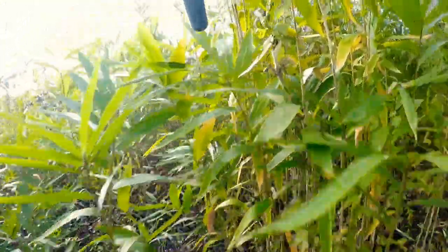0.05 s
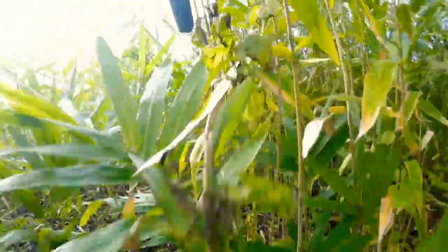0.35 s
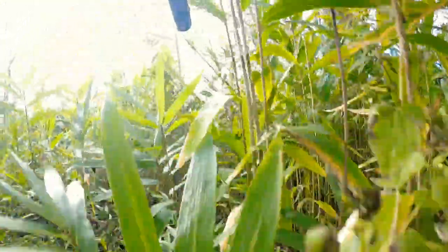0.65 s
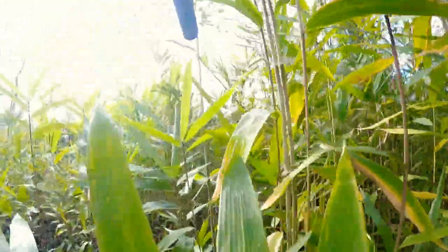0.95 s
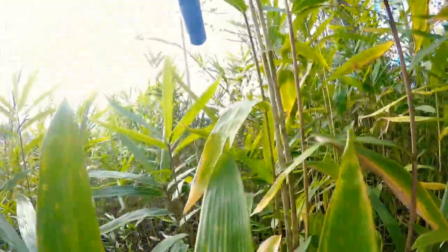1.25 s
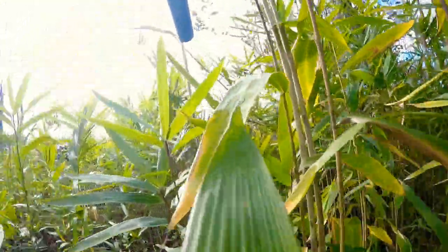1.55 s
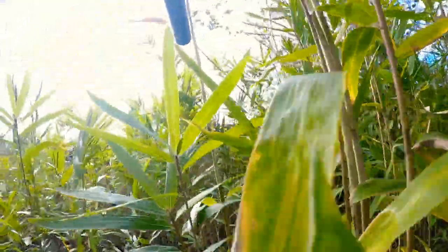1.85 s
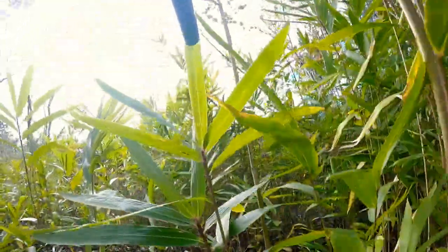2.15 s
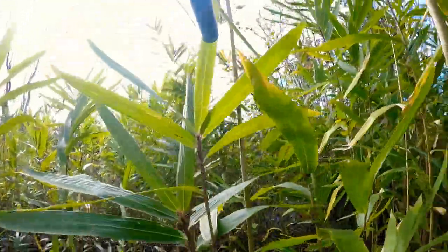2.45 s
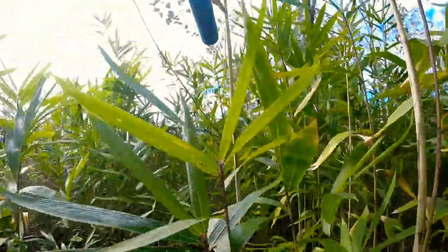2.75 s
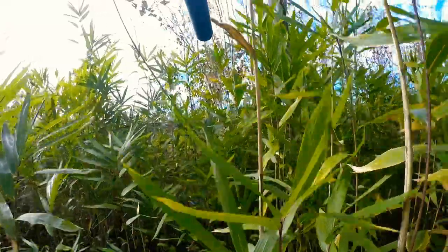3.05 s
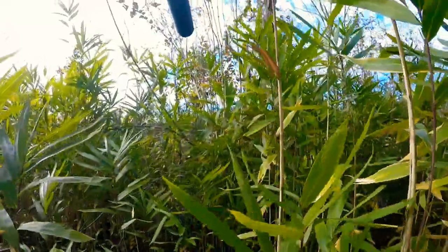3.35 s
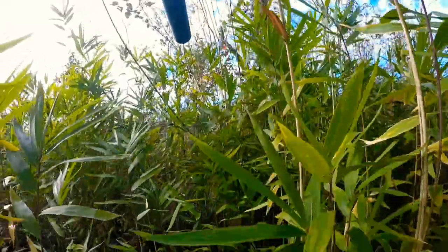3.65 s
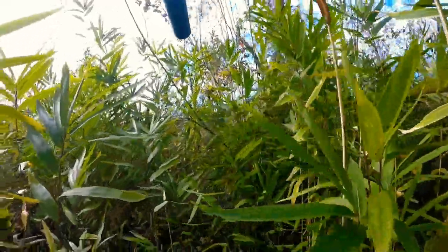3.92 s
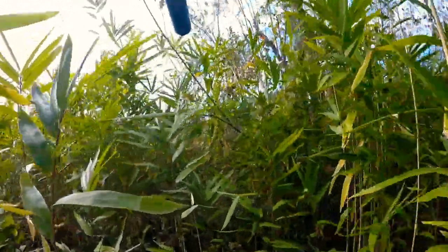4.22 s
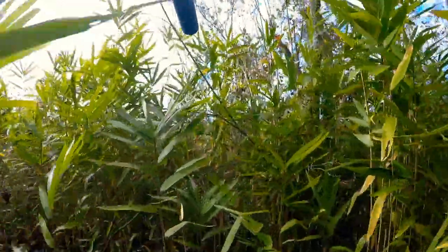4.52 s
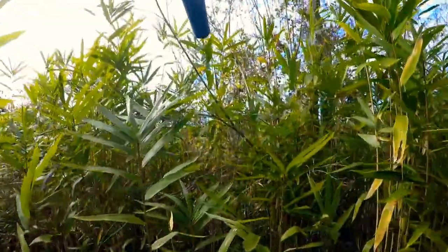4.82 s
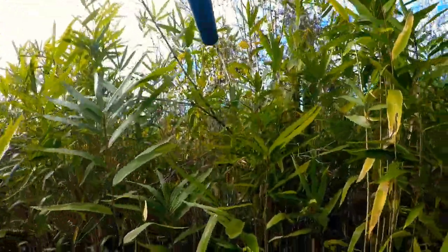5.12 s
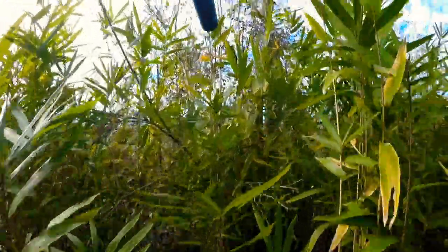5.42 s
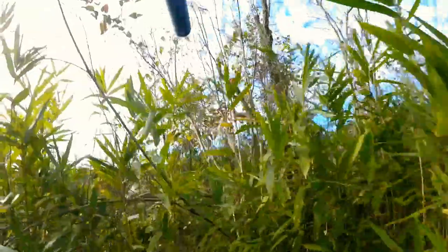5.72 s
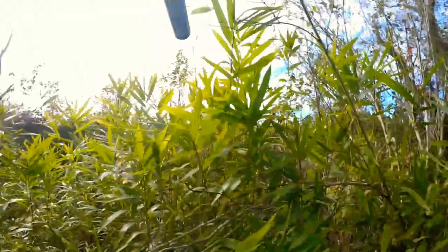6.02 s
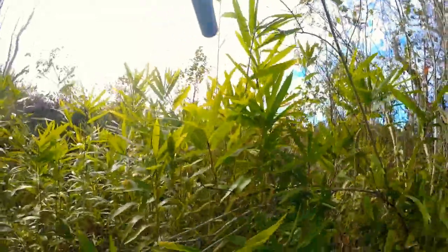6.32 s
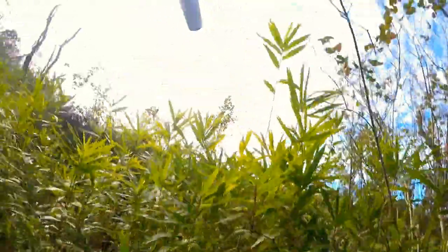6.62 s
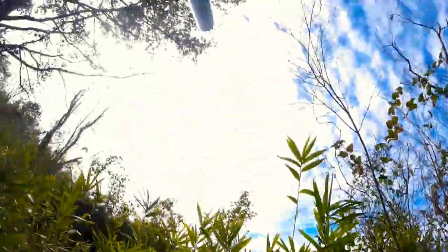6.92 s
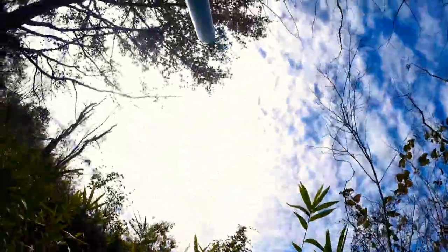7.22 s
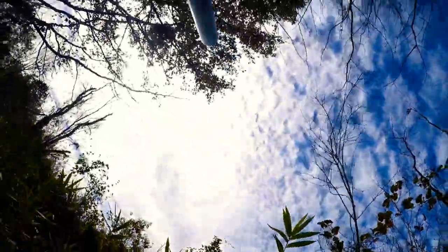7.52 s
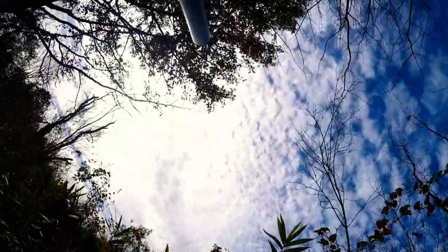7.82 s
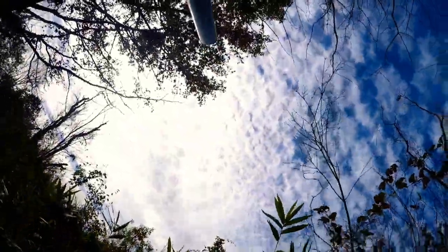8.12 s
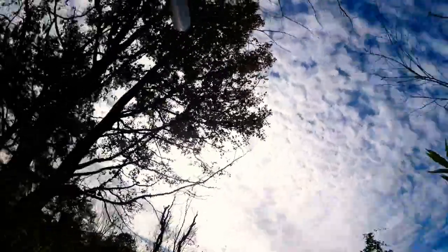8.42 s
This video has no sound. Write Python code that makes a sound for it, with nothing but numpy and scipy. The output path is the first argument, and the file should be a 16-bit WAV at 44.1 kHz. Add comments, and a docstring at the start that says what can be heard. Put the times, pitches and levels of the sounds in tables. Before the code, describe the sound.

Someone pushes through a dense cane thicket outdoors, heard from a camera worn on the body. Dry leaves swish and crackle right at the microphones, and twigs snap, most thickly at the start. Stems knock on the case throughout, and scrape and briefly squeal along it in the first half. Later come duller bumps and creaks from the holder. Every step shakes the mount into a heavy low rumble, and the rustle thins near the end.

```python
"""Dry leaves swish and crackle right at the microphones, and twigs snap close by.
The place is a cane thicket, heard from the stereo pair of a body-worn camera pushed through it.
Stems knock, scrape and squeal on the case, which rocks between its two microphones and creaks
in its holder. Underneath, every step shakes the mount into a heavy low rumble."""
import sys
import numpy as np
from scipy import signal
from scipy.fft import rfft, irfft, next_fast_len
from scipy.io import wavfile
from scipy.ndimage import map_coordinates

SR = 44100
rng = np.random.default_rng(int(sys.argv[2]) if len(sys.argv) > 2 else 0)


def int16_out(signal):
    """Quantize to a 16-bit WAV file."""
    q = np.round(np.clip(np.atleast_2d(signal).T, -1, 1) * 32767)
    wavfile.write(sys.argv[1], SR, q.astype(np.int16))


N = 381906

# foliage pressing on the body: (time [s], blade swish [dB], stalk crunch [dB])
BRUSHING = [(0, -37.5, -62), (.3, -30.5, -38), (.55, -34.5, -47.5), (.93, -32.5, -39), (1.03, -43.5, -58),
            (1.6, -45, -43.5), (2.17, -50, -49.5), (2.3, -41, -46.5), (3.0, -34.5, -41.5),
            (3.35, -37, -45.5), (4.5, -37.5, -46), (5.33, -34, -38.5), (5.4, -46.5, -51), (5.83, -49, -50),
            (5.95, -42, -47.5), (6.75, -38, -49.5), (7.7, -47, -52), (8.66, -54.5, -59)]
# single sprays passing the microphones: (time [s], length [s], swish [dB], crunch [dB])
SPRAYS = [(0.104, 0.027, -31, -49), (.29, 0.11, -29, -38), (0.84, 0.048, -32.5, -45),
          (1.412, 0.026, -39.5, -48), (2.272, .06, -38, -43), (2.502, 0.058, -32.5, -40),
          (2.678, .06, -35, -38), (2.96, 0.047, -34.5, -41), (3.126, 0.011, -31, -40),
          (3.84, 0.052, -37, -56), (4.129, 0.016, -28, -46), (4.563, 0.077, -35, -60),
          (4.834, 0.13, -37.5, -56), (5.173, 0.06, -30, -40.5), (5.882, 0.033, -36.5, -57),
          (6.164, 0.054, -33, -72), (6.395, 0.04, -36.5, -49), (6.526, .02, -41, -35),
          (6.606, 0.027, -32.5, -43), (6.71, 0.11, -33.5, -36.5), (7.079, 0.2, -36.5, -43),
          (7.51, 0.018, -39.5, -53), (7.85, 0.19, -46.5, -50.5), (8.228, 0.049, -53, -65),
          (8.508, 0.068, -47.5, -46)]
# drier leaves add a fine sizzle near 10 kHz: (time [s], level against the swish [dB])
LEAF_DRYNESS = [(0, -18), (1.2, -15), (2.2, -14), (6.3, -15), (7.2, -7), (7.9, -5.5), (8.66, -10.5)]
# spectra of the swish, sizzle and crunch at close range: (frequency [Hz], relative density [dB])
SWISH_SPECTRUM = [(1500, -10), (3500, -5), (5000, -5), (6300, 1), (7300, 2.5), (7800, 1), (8500, -9),
                  (10000, -10), (11500, -13), (13200, -16.5), (14300, -32), (15500, -52)]
SIZZLE_SPECTRUM = [(5000, -54), (8300, -4), (9300, -3), (10200, -1), (11500, -12), (13500, -17),
                   (15000, -46)]
CRUNCH_SPECTRUM = [(200, -1), (500, -12), (900, -5), (1500, 5), (2200, 3.5), (3000, 3), (4200, -2.5),
                   (5500, 0), (8000, -7.5), (12000, -66)]
def leaves():
    """Blades swish and sizzle against the wearer; stalks and litter crunch lower down."""
    rise_s, fall_s = .062, .071
    blade_sweeps = swells([(s, length, db) for s, length, db, _ in SPRAYS], rise_s, fall_s)
    stalk_sweeps = swells([(s, length, db) for s, length, _, db in SPRAYS], rise_s, fall_s)
    blades_db, stalks_db = curves(BRUSHING)
    blades = np.hypot(amp(blades_db), blade_sweeps)
    stalks = np.hypot(amp(stalks_db), stalk_sweeps)
    dry_blades = blades * amp(curves(LEAF_DRYNESS)[0])
    swish = blades * foliage(SWISH_SPECTRUM, rate=3000, spread_db=2, hiss_db=-.5, clump_db=3)
    sizzle = dry_blades * foliage(SIZZLE_SPECTRUM, rate=3000, spread_db=3.5, hiss_db=-.5, clump_db=5.5)
    crunch = stalks * foliage(CRUNCH_SPECTRUM, rate=2000, spread_db=4, hiss_db=0, clump_db=5.5)
    unevenness = amp(1.4 * wobble(22))
    return lulls() * unevenness * (swish + sizzle + crunch)


# stereo width of the leaves at the pair: (frequency [Hz], side minus mid [dB])
LEAF_WIDTH = [(500, 7.5), (3000, -8), (4300, -10), (5800, -2.5), (7300, -3.5), (8500, 2), (14000, -1)]
# their balance: (frequency [Hz], left minus right [dB])
LEAF_BALANCE = [(1000, 1), (3500, 0), (5800, 0.5), (7500, 3), (8800, -7.5), (14000, -3)]
def foliage(spectrum, rate, spread_db, hiss_db, clump_db):
    """Near leaves tick in clumps over the hiss of many farther ones."""
    clumps = amp(clump_db * (wobble(45) + wobble(220)))
    ticks = np.array([grains(rate, spread_db), grains(rate, spread_db)])
    rustle = unit(clumps * ticks) + amp(hiss_db) * rng.standard_normal((2, N))
    mid = filtered(rustle[0], lambda hz: amp(along(spectrum, hz)))
    side = filtered(rustle[1], lambda hz: amp(along(spectrum, hz) + along(LEAF_WIDTH, hz)))
    stereo = np.array([mid + side, mid - side]) / np.std(mid)
    return filtered(stereo, lambda hz: balance(along(LEAF_BALANCE, hz)))


# dips in the rustle at hard blows on the case: (time [s], depth [dB])
RUSTLE_DIPS = [(1.615, 10), (2.565, 6), (4.215, 4.5), (5.35, 11), (5.49, 3.5), (8.068, 12)]
def lulls(onset_s=.01, return_s=.074):
    """Gain of the rustle: a quick drop, then a gradual return."""
    t, dip_db = np.arange(N) / SR, 0
    for s, depth_db in RUSTLE_DIPS:
        onset = np.clip((t - s) / onset_s, 0, 1)
        dip_db += depth_db * onset * np.exp(-((t - s) / return_s) ** 2)
    return amp(-dip_db)


# twigs and dry leaves breaking close by: (time [s], level [dB], woody band [dB], left minus right [dB])
TWIG_BREAKS = [(0.19, -16, -6, -5), (0.27, -21, -17, 3), (0.3406, -11, -4, 1), (0.404, -14, -25, 3),
               (0.462, -16.5, -31, 0), (0.6826, -23, -24, 5), (0.7113, -26, -17, 1.5),
               (0.922, -15.5, -24, 4), (0.969, -16.5, 2, -5), (1.4885, -24.5, -16, -10),
               (1.6077, -23.5, -29, -18), (2.4857, -25, -22, -2), (3.1293, -12.5, -30, 7),
               (3.5743, -20.5, -26, 2), (4.373, -21.5, -18, 6), (4.4007, -24, -17, 2), (5.4586, -23, 4, 6),
               (5.6675, -31.5, -19, 5), (5.876, -28, 5, 4), (6.528, -15.5, -25, -1), (6.8525, -20, -27, -6),
               (8.5346, -24, -13, -1.5)]
# spectrum of a break: (frequency [Hz], relative density [dB])
TWIG_SPECTRUM = [(600, -17), (2500, -2.5), (5000, -0.5), (7300, 10), (9000, -7), (12000, -15), (15500, -38)]
def snaps(span_s=.00078):
    """Each break cracks and splinters briefly, with the energy of its level held for span_s."""
    out, t = np.zeros((2, N)), np.arange(2048) / SR
    fracture = amp(-60 * t / .006) + amp(-13 - 60 * t / .035)
    for s, db, woody_db, left_db in TWIG_BREAKS:
        burst = fracture * (rng.standard_normal(len(t)) + .62 * rng.standard_normal((2, len(t))))
        wood = lambda hz: 1 + amp(woody_db) * band((2200, 5000), hz)
        crack = filtered(burst, lambda hz: amp(along(TWIG_SPECTRUM, hz)) * wood(hz))
        crack *= np.sqrt(span_s * SR) / np.linalg.norm(crack.mean(0))
        add(out, s, amp(db) * crack * balance(left_db))
    return out


# modes of the case that holds the microphones: (frequency [Hz], width [Hz], level [dB])
CASE_MODES = [(190.5, 16.4, 7), (254, 104, -4.5), (347, 36, 5.5), (413, 41, 0), (478.6, 20, 6),
              (600, 125, -3), (708, 144, -11), (1030, 126, 2.5), (1206, 250, 1.5), (1395, 50, -4),
              (1540, 260, 7.5), (1810, 46, 6), (2190, 190, 8), (2370, 150, 3)]
# the thump, thud, knock and clack registers: (low edge [Hz], high edge [Hz])
KNOCK_REGISTERS = [(140, 280), (280, 520), (520, 1000), (1000, 2800)]
# stems hitting the case:
# (time [s], thump [dB], thud [dB], knock [dB], clack [dB], chatter t60 [s], stem note [Hz])
STEM_HITS = [(.251, -29, -31, -27.5, -25, 0.015, 2030), (.902, -28, -30, -19, -25, 0.023, 700),
             (.963, -35, -35, -22.5, -27.5, .018, 810), (1.019, -34, -54, -20, -43, 0.0081, 1062),
             (1.181, -28, -33, -19.5, -30, 0.017, 1060), (1.49, -29, -35.5, -15.5, -23.5, 0.014, 850),
             (1.609, -30, -33, -16.5, -18, .018, 1530), (2.038, -36, -31, -31, -30, 0.021, 474.6),
             (2.143, -57, -36, -21, -26, 0.073, 476), (3.023, -55, -27, -22, -37, 0.038, 471),
             (3.298, -40, -35, -14.5, -30.5, 0.054, 596), (3.394, -33.5, -41, -16.5, -41, 0.018, 600),
             (3.471, -34, -42, -19, -44, 0.02, 596), (3.787, -30, -18.5, -40, -57, 0.028, 402.5),
             (4.21, -35, -22, -27, -23.5, 0.038, 1607), (4.221, -28.5, -20, -20, -23, 0.03, 696.4),
             (5.192, -23, -25, -29, -51, 0.033, 350), (5.343, -19.5, -16.5, -25, -27, .032, 352),
             (5.505, -24, -24.5, -24, -30.5, .02, 500), (5.644, -23.5, -28.5, -35, -45, 0.032, 350),
             (5.962, -39, -41, -29.5, -28, 0.019, 1455), (6.225, -48, -43, -40, -25, 0.036, 1408),
             (6.337, -26.5, -38, -31, -40, 0.015, 673), (6.476, -27, -24, -29, -38.5, .014, 468),
             (6.585, -25, -21.5, -29, -49, 0.022, 350.6), (6.623, -28, -44, -39, -21, 0.011, 2200),
             (6.772, -22, -18, -36, -44, 0.052, 356), (7.156, -27, -38, -29, -38, 0.023, 351.4),
             (7.618, -15.5, -24, -30, -49, .023, 400), (8.063, -14.5, -15, -26, -31, .014, 465)]
def knocks(span_s=.033, stem_width_hz=58, stem_db=6, size=12288):
    """A stem hits and chatters on the case, ringing both; where it lands weights the four registers."""
    out, t, hz = np.zeros((2, N)), np.arange(size) / SR, np.fft.rfftfreq(size, 1 / SR)
    centres_hz = np.sqrt(np.prod(KNOCK_REGISTERS, axis=1))
    case = ringing(CASE_MODES, hz)
    passband = band((150, 2650), hz) * causal(1 / (1 + (hz / 2900) ** 10))
    # the lowest mode moves both microphones more nearly in step
    microphones = mic_pair(phase_rad=along([(195, 1.46), (260, 2.48)], hz),
                           left_db=along([(195, -6.5), (330, -1)], hz))
    for s, *levels_db, t60, stem_hz in STEM_HITS:
        chatter = amp(-60 * t / t60) + amp(-18 - 60 * t / .13)  # the stem rattles on faintly
        force = chatter * rng.standard_normal(size)
        force[0] += 3.5  # the first contact
        stem = ringing([(stem_hz, stem_width_hz, stem_db)], hz)
        ring = rfft(force) * passband * (case + stem)
        # each register gets about the energy of its level held for span_s
        bin_energy = np.abs(ring) ** 2 * 2 / size
        energy = np.array([bin_energy[(hz > lo) & (hz < hi)].sum() for lo, hi in KNOCK_REGISTERS])
        gains_db = np.array(levels_db) - 10 * np.log10(energy / (span_s * SR))
        colour = causal(amp(along(np.c_[centres_hz, gains_db], hz)))
        add(out, s, irfft(ring * colour * microphones))
    return out


SCRAPE_RISE_S, SCRAPE_FALL_S = .018, .032
# stems dragged along the case, two lists each: pushes (time [s], length [s], level [dB])
# and resonances (frequency [Hz], width [Hz], level [dB])
STEM_DRAGS = [([(1.695, 0.046, -20), (1.82, .015, -27.5), (1.86, 0.14, -37.5)], [(790, 59, -4),
              (1046, 120, -1), (1510, 200, -1.5), (2230, 160, 0.5), (2300, 90, -2)]), ([(2.05, 0.073, -31),
              (2.147, 0.019, -21)], [(469.6, 12, 1.5), (604, 80, -12), (1470, 230, -14)]),
              ([(2.49, 0.12, -21.5), (2.525, 0.044, -15), (2.615, .04, -17.5), (2.67, 0.15, -25.5),
              (2.79, 0.11, -17)], [(339.7, 60, -16), (582.6, 44, 1.5), (756, 47, -5.5), (1198, 115, -1.5),
              (1391, 60, 8.5), (1570, 100, -4), (1880, 40, -6), (2330, 130, -7)]), ([(2.945, 0.039, -21)],
              [(475, 20, 3), (756, 370, -12), (1640, 180, -17)]), ([(5.045, 0.017, -21.5),
              (5.093, 0.04, -16)], [(726, 193, -12), (1150, 107, -5), (1692, 164, 6), (2066, 147, -6)]),
              ([(5.365, .01, -30.5), (5.455, 0.052, -29)], [(1215, 90, -4), (1502, 250, 4),
              (1996, 400, -11)])]
def scrapes():
    """Ribbed stems stick and slip unevenly; rasp and squeal reach the microphones through the case."""
    slip_hz = 150 * np.exp(.3 * wobble(15) + .3 * wobble(150))
    slip_count = np.floor(np.cumsum(slip_hz) / SR)
    slips = np.diff(slip_count, prepend=0) * amp(1.5 * wobble(200))
    force = unit(slips) + 1.83 * grains(rate=2500, spread_db=1.5)
    passband = lambda hz: band((280, 2700), hz) / (1 + (hz / 2900) ** 20)
    out = np.zeros(N)
    for pushes, modes in STEM_DRAGS:
        rasp = filtered(force, lambda hz: ringing(modes, hz) * passband(hz))
        out += swells(pushes, SCRAPE_RISE_S, SCRAPE_FALL_S) * unit(rasp)
    return rocking(out + squeals(), phase_rad=2.18, left_db=-1.1)


# stems slipping evenly: (time [s], length [s], level before colouring [dB], pitch [Hz], rise [Hz/s])
STEM_SQUEALS = [(2.524, 0.069, -25, 585, 700), (2.62, 0.085, -27, 630, 1400), (2.797, .035, -22, 515, 1792),
                (2.851, 0.039, -21.5, 615, 1500)]
# how the case colours the harmonics: (frequency [Hz], gain [dB])
CASE_COLOUR = [(400, -10), (520, 1), (620, -3.5), (800, -20), (1000, -21), (1220, 1.5), (1380, 10.5),
               (1700, -12), (2400, -18), (3000, -37)]
def squeals():
    """Fast, nearly even slipping on the case gives a rough tone that rises as the stem speeds up."""
    out, t = np.zeros(N), np.arange(N) / SR
    for s, length, db, first_hz, rise in STEM_SQUEALS:
        pitch = first_hz + rise * np.clip(t - s, -SCRAPE_RISE_S, length + SCRAPE_FALL_S)
        phase = 2 * np.pi * np.cumsum(pitch * (1 + .015 * wobble(250))) / SR
        tone = sum(amp(along(CASE_COLOUR, k * pitch)) * np.sin(k * phase) for k in range(1, 5))
        roughness = amp(2.4 * wobble(180))
        out += swells([(s, length, db)], SCRAPE_RISE_S, SCRAPE_FALL_S) * roughness * tone
    return out


def leaf_flick(time_s=4.3175, gain_db=2, pitch_hz=1190, t60_s=.0073, attack_s=.00046):
    """A leaf tip flicks the microphone ports: a short hollow pop, nearly alike on both sides."""
    out, t = np.zeros((2, N)), np.arange(2048) / SR
    envelope = amp(gain_db - 60 * t / t60_s) * (1 - np.exp(-t / attack_s))
    pop = envelope * np.sin(2 * np.pi * pitch_hz * t)
    add(out, time_s, rocking(pop, phase_rad=.6, left_db=2))
    return out


SHIFT_RISE_S, SHIFT_FALL_S = .072, .11
# the case shifting in its holder: (time [s], length [s], creak [dB], mount drone [dB])
CASE_SHIFTS = [(0.012, 0.19, -43, -38.5), (0.298, 0.14, -36.5, -39), (0.816, .18, -26, -31.5),
               (1.5, 0.23, -38.5, -54), (2.054, 0.46, -31, -53), (2.56, .1, -28, -33),
               (2.745, 0.21, -30.5, -58), (3.335, 0.39, -41, -47), (3.71, 0.12, -31.5, -45),
               (4.15, 0.22, -30.5, -36), (4.496, 0.19, -36.5, -53), (5.197, 0.38, -25.5, -32.5),
               (5.797, 0.047, -24.5, -41), (6.091, .03, -38.5, -48), (6.501, .14, -30, -34.5),
               (6.688, 0.18, -28.5, -33.5), (7.087, 0.1, -30.5, -36.5), (7.244, .07, -18.5, -33),
               (7.632, 0.092, -34, -31), (7.88, .16, -30, -34.5), (8.079, 0.061, -37, -25.5),
               (8.248, 0.63, -36, -43)]
# the dull colour of the rubbing, laid over the case modes: (frequency [Hz], gain [dB])
CREAK_COLOUR = [(150, -28), (195, 7), (250, 2.5), (350, 2), (520, -3), (750, -2.5), (1000, -14.5),
                (2000, -23), (2800, -29.5), (4000, -56)]
def creak():
    """The case rubs in its holder, right at the microphones, in small dull jolts."""
    jolts = grains(rate=700, spread_db=1) * amp(3.5 * wobble(40))
    body = unit(filtered(jolts, lambda hz: ringing(CASE_MODES, hz) * amp(along(CREAK_COLOUR, hz))))
    shifts = [(s, length, db) for s, length, db, _ in CASE_SHIFTS]
    rubbing = swells(shifts, SHIFT_RISE_S, SHIFT_FALL_S, floor_db=-42.5)
    return rocking(rubbing * body, phase_rad=2.56, left_db=-1.5)


# slow sway of the wearer's body: (time [s], level [dB])
BODY_SWAY = [(0, -44), (.4, -31.5), (.85, -23.5), (1.15, -30), (1.9, -31), (2.3, -28), (2.9, -30),
             (5.04, -29), (5.23, -25), (5.45, -30), (6.7, -30.5), (7.3, -31.5), (7.7, -35), (8.05, -29.5),
             (8.66, -32)]
# spectrum of the sway: (frequency [Hz], relative density [dB])
SWAY_SPECTRUM = [(10, -40), (20, -3), (28, 1), (50, 0), (70, -5), (130, -12), (170, -24), (300, -50),
                 (600, -100)]
# steps and jerks that swing the mount: (time [s], level [dB], base frequency under that grip [Hz])
STEPS = [(.12, -22, 82.74), (.39, -19, 83.1), (.61, -20.5, 85), (.83, -19.5, 85.65), (0.951, -13, 96.7),
         (1.08, -22, 97.06), (1.2, -21, 98.35), (1.5, -14.5, 96.7), (1.648, -14, 93.87), (2.04, -19, 83),
         (2.33, -16, 92.6), (2.54, -18.5, 82.5), (2.74, -18.5, 98.4), (2.98, -12, 92.9), (3.31, -21, 92),
         (3.48, -17, 98.3), (3.599, -22, 92.1), (3.84, -16, 92.1), (4.12, -17.5, 90.05), (4.22, -12.5, 89),
         (4.41, -17.5, 93.6), (4.68, -23, 90), (5.19, -15, 100.9), (5.35, -11.5, 94.74), (5.47, -18, 91.3),
         (5.6, -15, 93.3), (5.831, -13, 94.4), (5.96, -28, 92.3), (6.339, -19.5, 89), (6.49, -14.5, 86.94),
         (6.6, -21.5, 85.56), (6.771, -11, 84.15), (6.87, -26, 84.5), (7.11, -18.5, 84.66),
         (7.26, -12.5, 88), (7.34, -17, 96.8), (7.621, -13.5, 81.8), (7.68, -11.5, 79.15),
         (8.06, -14.5, 84.5), (8.45, -25, 90.2), (8.64, -18.5, 93.2)]
# resonances of the mount: (frequency [Hz], width [Hz], level [dB])
MOUNT_MODES = [(83.7, 18, 3.5), (96.6, 15, 1)]
def rumble(rise_s=.047, hold_s=.015, tremble_db=-13.5):
    """Steps come up through the mount: a lumpy sway and a boom near 90 Hz that trembles on."""
    lows = filtered(rng.standard_normal(N), lambda hz: amp(along(SWAY_SPECTRUM, hz)))
    sway = amp(curves(BODY_SWAY)[0]) * unit(lows * amp(2.1 * wobble(12)))
    # the mount swings in two directions at different rates, so the boom beats
    _, base_hz = curves(STEPS)
    main_swing = resonance(1.02 * base_hz, wander_rad=.8, flutter_db=2)
    cross_swing = amp(-7.5) * resonance(.84 * base_hz, wander_rad=.8, flutter_db=2)
    jolts = [(s, hold_s, db) for s, db, _ in STEPS]
    boom = swells(jolts, rise_s, fall_s=.19) * unit(main_swing + cross_swing)
    aftershocks = [(s, hold_s, db + tremble_db) for s, db, _ in STEPS]
    shaking = filtered(rng.standard_normal(N), lambda hz: ringing(MOUNT_MODES, hz) * band((62, 122), hz))
    tremble = swells(aftershocks, rise_s, fall_s=.5, floor_db=-34) * unit(shaking)
    return rocking(sway + boom + tremble, phase_rad=-.5, left_db=-6.5)


def mount_drone(pitch_hz=189):
    """A higher, weaker resonance of the mount swells as the case shifts."""
    shifts = [(s, length, db) for s, length, _, db in CASE_SHIFTS]
    strain = swells(shifts, SHIFT_RISE_S, SHIFT_FALL_S, floor_db=-51)
    drone = strain * resonance(np.full(N, pitch_hz), wander_rad=1.7, flutter_db=3.5)
    return rocking(drone, phase_rad=1.1, left_db=-9)


def rocking(x, phase_rad, left_db):
    """Vibration of the case reaches the two microphones out of step."""
    return filtered(x, lambda hz: mic_pair(phase_rad, left_db))


def mic_pair(phase_rad, left_db):
    """Left and right responses, apart by this phase and level."""
    return balance(left_db) * np.exp(1j * np.outer([.5, -.5], phase_rad))


def balance(left_db):
    """Left and right gains, the left higher by left_db."""
    return amp(np.outer([.5, -.5], left_db))


def resonance(hz, wander_rad, flutter_db):
    """A randomly shaken resonance: its phase drifts and its size flutters."""
    phase = 2 * np.pi * np.cumsum(hz) / SR + wander_rad * wobble(24)
    return unit(np.sin(phase) * amp(flutter_db * wobble(32)))


def ringing(modes, hz):
    """The summed response of (frequency [Hz], width [Hz], level [dB]) resonances."""
    grid = np.geomspace(20, SR / 2, 3000)
    total = sum(amp(db) * 1j * grid * width / (centre ** 2 - grid ** 2 + 1j * grid * width)
                for centre, width, db in modes)
    return np.interp(hz, grid, total)


def grains(rate, spread_db):
    """Tiny random impulses, about rate a second, a few much stronger than the rest."""
    sizes = amp(spread_db * np.minimum(rng.exponential(size=N), 4))
    return unit((rng.random(N) < rate / SR) * sizes * rng.choice([-1, 1], N))


def swells(rows, rise_s, fall_s, floor_db=-120, step=32):
    """Gain of (time [s], length [s], level [dB]) events, moving 20 dB per rise_s and fall_s."""
    t = np.arange(0, N + step, step) / SR
    power = amp(floor_db) ** 2
    for s, length, db in rows:
        away = np.maximum(s - t, 0) / rise_s + np.maximum(t - s - length, 0) / fall_s
        power = power + amp(db - 20 * np.minimum(away, 10)) ** 2
    return np.interp(np.arange(N) / SR, t, np.sqrt(power))


def wobble(rate, step=16):
    """A smooth random curve, rate knots a second."""
    coarse = np.arange(0, N + step, step)
    knots = rng.standard_normal(int(N * rate / SR) + 4)
    return np.interp(np.arange(N), coarse, map_coordinates(knots, [coarse * rate / SR], mode="nearest"))


def curves(rows):
    """One value per sample for each column after the time."""
    times, *columns = np.transpose(rows)
    return [np.interp(np.arange(N) / SR, times, column) for column in columns]


def along(points, hz):
    """(frequency [Hz], value) points read on a log axis."""
    frequencies, values = np.transpose(points)
    return np.interp(np.log(hz + 1), np.log(frequencies + 1), values)


def filtered(x, response):
    """x through a complex response of frequency."""
    n = x.shape[-1]
    padded = next_fast_len(n + 8192, True)
    return irfft(rfft(x, padded) * response(np.fft.rfftfreq(padded, 1 / SR)), padded)[..., :n]


def band(edges, hz):
    """A causal band-pass response."""
    return signal.freqs(*signal.butter(3, edges, "band", analog=True), hz)[1]


def causal(gain):
    """The response with this gain that rings only after the blow."""
    cepstrum = irfft(np.log(gain + 1e-6))
    half = len(cepstrum) // 2
    return np.exp(rfft(np.r_[cepstrum[0], 2 * cepstrum[1:half], np.zeros(half)]))


def add(track, s, sound):
    """Mix a sound in at time s."""
    start = round(s * SR)
    part = sound[:, :N - start]
    track[:, start:start + part.shape[1]] += part


def amp(db):
    """Decibels to gain."""
    return 10 ** (np.asarray(db) / 20)


def unit(x):
    """Scaled to rms 1."""
    return x / np.sqrt(np.mean(np.abs(x) ** 2) + 1e-20)


def scene():
    """Close leaves and twigs through the air, plus everything that touches or shakes the camera."""
    return leaves() + snaps() + knocks() + leaf_flick() + scrapes() + creak() + rumble() + mount_drone()


def record(dry):
    """The camera rounds off the highest peaks and keeps nothing above 15.5 kHz."""
    rounded = dry / (1 + np.abs(dry) ** 8) ** (1 / 8)
    return filtered(rounded, lambda hz: hz < 15500)


dry = scene()
out = record(dry)
int16_out(out)
```